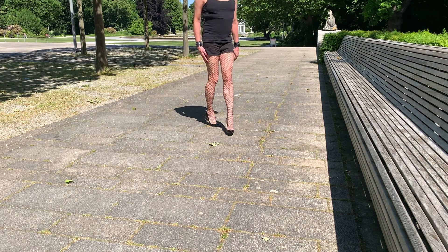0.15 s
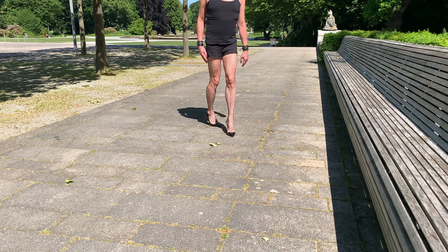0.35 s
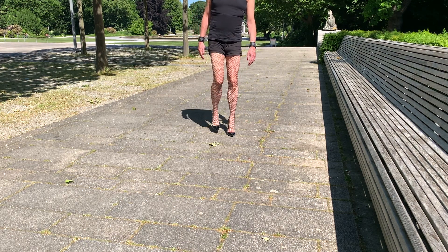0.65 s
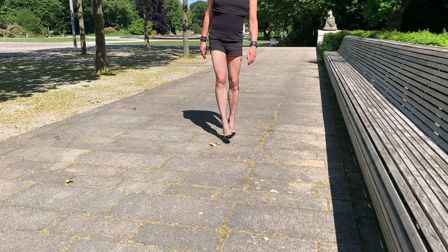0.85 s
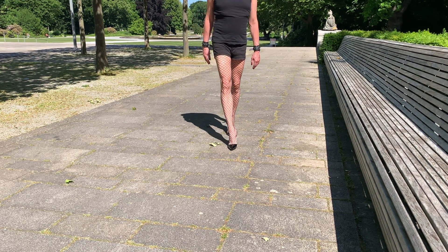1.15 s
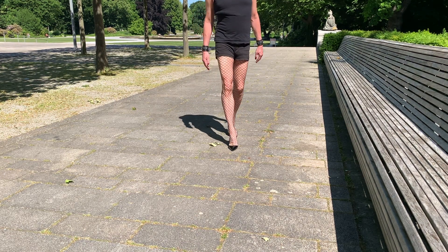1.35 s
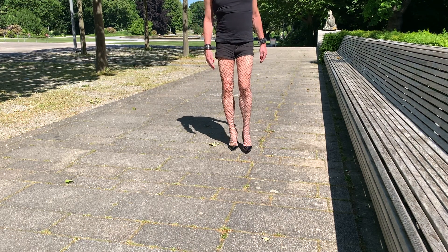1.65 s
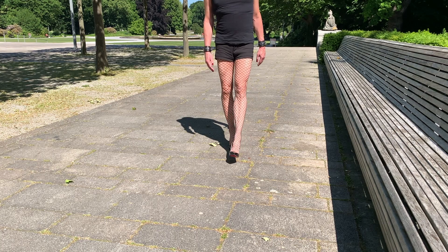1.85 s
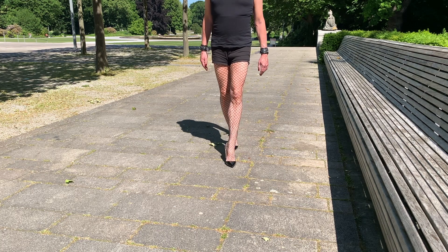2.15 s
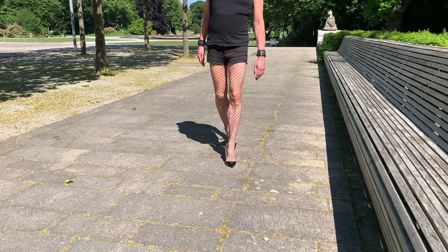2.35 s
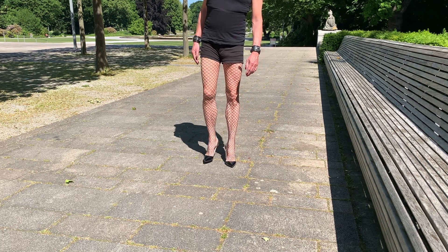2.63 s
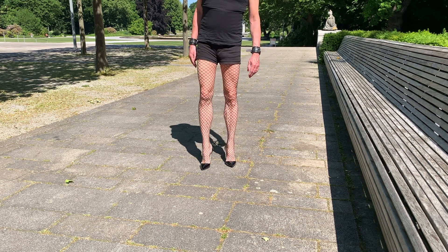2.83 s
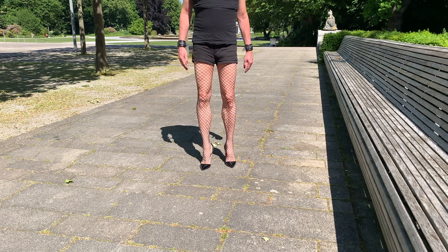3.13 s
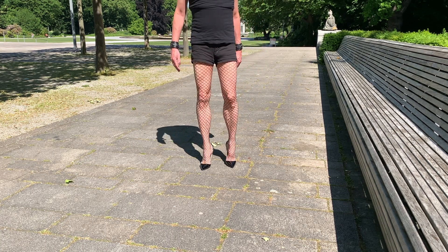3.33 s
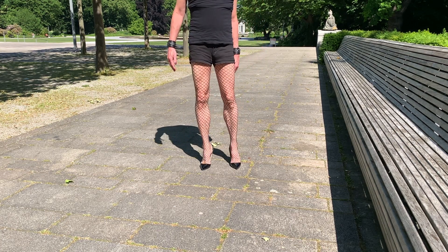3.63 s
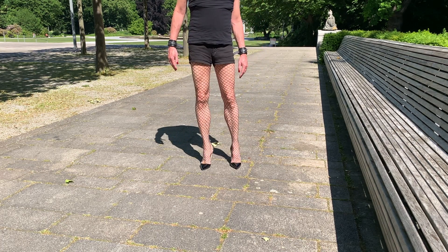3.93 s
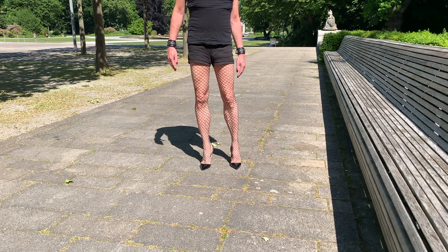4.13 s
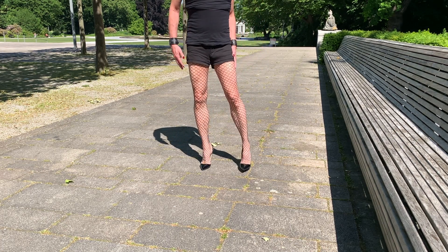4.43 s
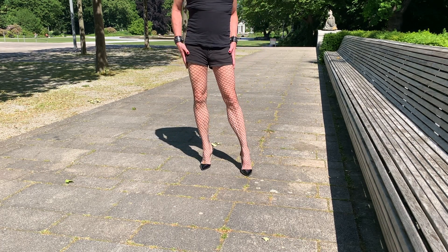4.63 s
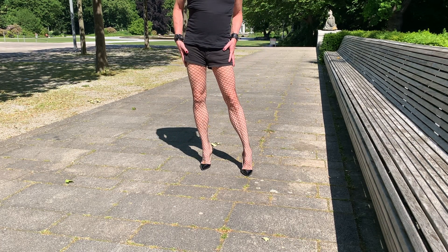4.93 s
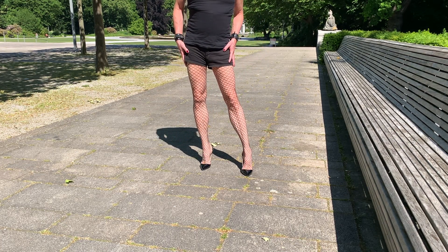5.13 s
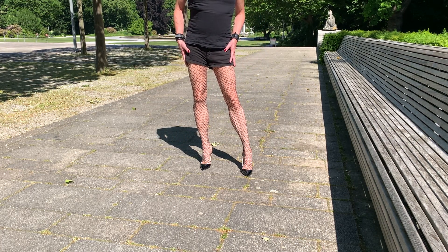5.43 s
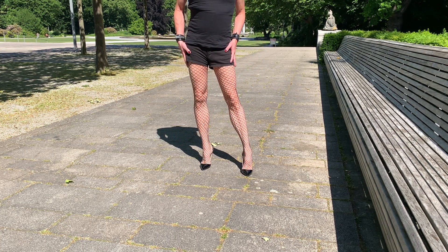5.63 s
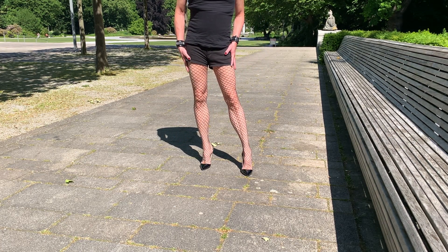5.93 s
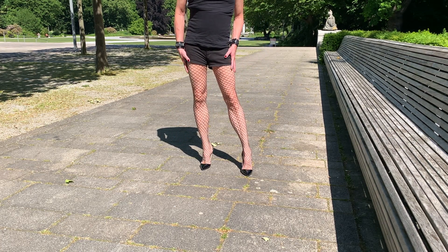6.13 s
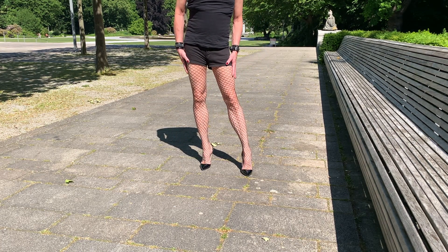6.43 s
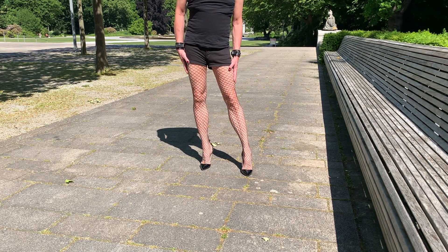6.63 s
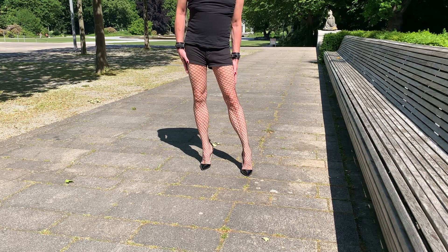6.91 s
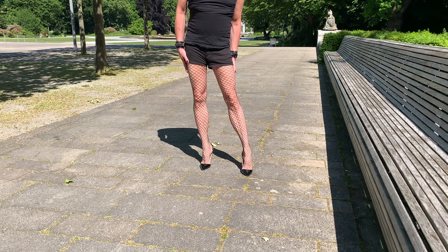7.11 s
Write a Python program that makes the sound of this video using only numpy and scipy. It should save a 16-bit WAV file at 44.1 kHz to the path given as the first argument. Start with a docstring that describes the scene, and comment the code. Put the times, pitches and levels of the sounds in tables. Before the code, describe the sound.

Slow, uneven steps of hard-tipped heels click and slap on gritty stone, with short reflections from a bench and trees. The strongest step comes past the middle, a final click follows, and walking ends. After that only faint cloth strokes, twittering birds and the wavering low hum of far engines remain, with a soft leafy hiss and small wind bumps at the stereo microphone standing some distance in front.

```python
"""A park with stone paving, where someone in high heels takes a few slow steps and comes to a stop.
Shoe resonances, struck by short blows and grit noise, make the heel clicks and sole slaps.
Shaped noise makes the scuff, the hands brushing cloth, the traffic, the leaves and the wind bumps.
Far engines are stacks of wavering sines; small birds in the trees are gliding sines with trembling pitch."""
import sys
import numpy as np
from scipy import signal
from scipy.fft import rfft, irfft, next_fast_len
from scipy.io import wavfile
from scipy.ndimage import uniform_filter1d

SR = 44100
rng = np.random.default_rng(int(sys.argv[2]) if len(sys.argv) > 2 else 0)


def log_audio(samples):
    """Write samples as a 16-bit WAV file to the path given in sys.argv[1]."""
    # one column per channel
    frames = np.atleast_2d(samples).T
    # limit to full scale, then quantise
    limited = np.clip(frames, -1, 1)
    pcm = np.round(limited * 32767).astype(np.int16)
    wavfile.write(sys.argv[1], SR, pcm)


N = 320607
TIME = np.arange(N) / SR


def from_db(db):
    """Decibels to gain."""
    return 10 ** (np.asarray(db) / 20)


def rms_one(x):
    """Scale to unit rms."""
    return x / np.sqrt(np.mean(x ** 2) + 1e-20)


def in_time(rows):
    """Each column of a curve, sample by sample."""
    s, *columns = np.transpose(rows)
    return [np.interp(TIME, s, c) for c in columns]


def at_hz(points, hz):
    """Read a spectrum on a log-frequency axis."""
    f, value = np.transpose(points)
    return np.interp(np.log(np.maximum(hz, 1)), np.log(f), value)


def add(out, s, sound):
    """Mix a sound in at a given time."""
    i = round(s * SR)
    out[i:i + len(sound)] += sound[:len(out) - i]


def bandpass(x, low, high):
    """Causal band-pass."""
    sos = signal.butter(2, [low, min(high, SR / 2 - 1)], "band", fs=SR, output="sos")
    return signal.sosfilt(sos, x)


def split_off(x, kind, hz):
    """Keep the lows or the highs on one side of a crossover, at unit rms."""
    return rms_one(signal.sosfilt(signal.butter(3, hz, kind, fs=SR, output="sos"), x))


def drift(rate, size):
    """A random wander: straight lines between normal draws, rate draws per second."""
    at = np.arange(size) * rate / SR
    return np.interp(at, np.arange(size), rng.standard_normal(size))


# how alike the two ears are: pitch_hz, likeness (1 same, 0 unrelated, -1 opposed)
EAR_LIKENESS = [(30, 0.97), (70, 0.92), (300, 0.88), (700, -0.38), (2000, -0.14), (5000, 0.23),
                (12000, -0.081)]


def stereo_noise(colour, size=N):
    """Coloured noise at unit rms, nearly alike in both ears in the bass and much less so above."""
    length = next_fast_len(size)
    hz = np.arange(length // 2 + 1) * SR / length
    mid, side = rfft(rng.standard_normal((2, length))) * from_db(at_hz(colour, hz))
    alike = np.clip(at_hz(EAR_LIKENESS, hz), -1, 1)
    ears = np.sqrt(1 + alike) * mid + np.sqrt(1 - alike) * side * [[1], [-1]]
    return rms_one(irfft(ears, length)[:, :size])


def bells(rows):
    """A gain that rises and falls smoothly around each start_s, width_s, level_db."""
    return sum(from_db(db) * np.exp(-.5 * ((TIME - s) / width) ** 2) for s, width, db in rows)


def friction(gain, colour, grain_db, grain_rate):
    """Sliding contact: noise that catches and lets go, grain_rate draws per second."""
    return gain * rms_one(stereo_noise(colour) * from_db(grain_db * drift(grain_rate, N)))


def from_left(x, lag_s):
    """Two ears; the right one hears the sound a little later."""
    return np.array([x, np.interp(TIME - lag_s, TIME, x)])


def patchy(x, patchy_db, size):
    """Moving air lets each narrow band of a far sound swell and fade on its own."""
    _, _, cells = signal.stft(x, nperseg=size)
    swell = rng.standard_normal(cells.shape[1:])
    swell = uniform_filter1d(swell, size=5, axis=0)   # across pitch
    swell = uniform_filter1d(swell, size=9, axis=1)   # across time
    return signal.istft(cells * from_db(patchy_db * rms_one(swell)), nperseg=size)[1][:, :N]


# colour of traffic and leaves together: pitch_hz, relative_level_db (per Hz)
AIR_COLOUR = [(25, -24), (42, -9.5), (60, 3), (80, -4.5), (115, -12), (190, -14.5), (240, -22),
              (400, -23.5), (750, -31), (1300, -45.5), (1850, -44.5), (2550, -45.5), (3100, -52),
              (5000, -60.5), (9000, -70), (14000, -65.5), (15000, -91.5)]
# the breeze lifts and drops the deepest rumble: time_s, change_db
BREEZE = [(0, 3.5), (0.9, -3), (1.2, -6), (3.2, 0.5), (3.65, 6), (4.0, -6.5), (4.9, -3), (5.5, -0.5),
          (7.27, 2)]
# the leaves rustle more and less: time_s, level_db
LEAF_HISS = [(0, -65), (0.9, -64.5), (1.6, -64), (2.8, -64), (5.2, -62.8), (6.1, -65)]
RUMBLE_DB, RUMBLE_SWELL_DB = -47.5, 0.5


def air(split_hz=1100, breeze_hz=62):
    """Traffic rumble below, leaves and tyres above, each with its own slow swell."""
    noise = patchy(stereo_noise(AIR_COLOUR), patchy_db=2.0, size=2048)
    rumble, hiss = split_off(noise, "low", split_hz), split_off(noise, "high", split_hz)
    deep = signal.sosfiltfilt(signal.butter(2, breeze_hz, fs=SR, output="sos"), rumble)
    (breeze_db,), (leaf_db,) = in_time(BREEZE), in_time(LEAF_HISS)
    rumble = rumble + (from_db(breeze_db) - 1) * deep
    return from_db(RUMBLE_DB + RUMBLE_SWELL_DB * drift(1, N)) * rumble + from_db(leaf_db) * hiss


ENGINE_LAG_S = 0.00043   # the engines reach the left ear this much earlier


def engine(pitch, level, orders, level_db, waver):
    """A far exhaust note: multiples of one pitch, each made to waver on its own by the air."""
    (hz,), (db,) = in_time(pitch), in_time(level)
    phase = 2 * np.pi * np.cumsum(hz) / SR
    tones = sum(from_db(order_db) * np.sin(k * phase) * (1 + waver * drift(14, N))
                for k, order_db in orders)
    return np.sqrt(2) * from_db(db + level_db) * tones


# the engine sags once, then runs nearly steadily: time_s, pitch_hz
DRONE_PITCH = [(0, 91.3), (.25, 86.1), (.7, 88.6), (1.05, 90), (2.4, 90.23), (7.27, 91.18)]
# its drone swells and fades: time_s, relative_level_db
DRONE_LEVEL = [(0.0, -50), (0.16, -53), (0.2, -57.5), (0.36, -43), (0.6, -39), (0.93, -46), (0.989, -55.5),
               (1.21, -41), (1.78, -45), (2.09, -65.5), (2.35, -42.5), (2.63, -35.5), (3.02, -39.5),
               (3.2, -44.5), (4.59, -42.5), (5.08, -50), (5.91, -38.5), (6.17, -56.5), (6.72, -33),
               (7.25, -40), (7.27, -37)]
# its harmonics: multiple of the pitch, relative_level_db
DRONE_ORDERS = [(1, 1), (2, -26.5), (3, -43), (4, -30.5)]


def near_engine():
    """The nearer engine: a fairly steady exhaust drone, mostly its fundamental."""
    return engine(DRONE_PITCH, DRONE_LEVEL, DRONE_ORDERS, level_db=-0.84, waver=0.1)


# the engine winds down twice: time_s, pitch_hz
FAR_PITCH = [(0, 133.4), (1.5, 139.7), (2.3, 130.7), (2.9, 116.4), (4.7, 136), (5.6, 126.3), (7.27, 121.1)]
# its loudness: time_s, relative_level_db
FAR_LEVEL = [(0, -53.5), (2.3, -53), (3.9, -55.5), (5.2, -53), (6.4, -52), (7.27, -71)]
# its partials: multiple of the pitch, relative_level_db
FAR_ORDERS = [(1, -2), (1.5, -13.5), (2, -13), (3, -16.5)]


def far_engine():
    """A second engine, its partials wavering strongly in the air."""
    return engine(FAR_PITCH, FAR_LEVEL, FAR_ORDERS, level_db=-3.0, waver=0.74)


# thump, knock, clack, tick and ping ranges of the shoe: low_hz, high_hz
SHOE_PARTS = [(240, 725), (830, 1460), (1520, 4060), (4200, 7860), (8400, 13600)]
THUMP_PART, KNOCK_PART, PING_PART = np.eye(5)[[0, 1, 4]]
HARDNESS_PIVOT_HZ = 1460
# how sole and heel ring when they are not the part that lands
SOLE_HZ, HEEL_HZ, RING_S = 658, 1760, 0.024


def landing(db, hardness, shares_db):
    """Level of each part in dB; a harder landing tilts the sound brighter about the pivot pitch."""
    octaves = np.log2(np.sqrt(np.prod(SHOE_PARTS, axis=1)) / HARDNESS_PIVOT_HZ)
    return db + hardness * octaves + shares_db


# the sole slaps the stone: start_s, level_db, hardness_db_per_octave, hollow_knock_db,
# sole_pitch_hz, heel_pitch_hz, ring_t60_s
SOLE_SLAPS = [(0.1898, -38.5, -2, -1, 630, 1380, 0.012), (1.114, -37, -4, 5, 690, 1400, 0.0097),
              (1.2168, -38, -2, -3.5, 757, 1330, 0.027), (2.1312, -43.5, 0.5, -11, 453, 2000, 0.0027),
              (2.8135, -53, -4.5, 13.5, 784, 1270, 0.0039), (2.8265, -47.5, -3, 1.5, 780, 1250, 0.0061),
              (2.8395, -57.5, -5, 7, 520, 1310, 0.014), (3.6175, -33.5, -0.5, -0.5, 650, 2250, 0.01),
              (4.5556, -29.5, -0.3, 2.5, 497, 1620, 0.0078), (4.5598, -37, 1.5, -9, 674, 2560, 0.014),
              (4.5658, -33.5, 0.1, 0.5, 816, 3480, 0.0024), (4.5803, -50.5, 4, 16.5, 820, 3550, 0.006),
              (4.9215, -43, -2.5, -15, 540, 990, 0.0027)]
# a slap's share in thump, knock, clack, tick and ping: relative_level_db
SLAP_PARTS_DB = [-2, -4, -10.5, -31, -31]
SOLE_GRIT = 0.12   # how much grit a sole grinds as it lands, 0-1


def sole_slaps():
    """Flat sole landings, strongest in the low parts of the shoe."""
    return [(s, landing(db, hardness, SLAP_PARTS_DB) + knock_db * KNOCK_PART,
             sole_hz, heel_hz, ring_s, SOLE_GRIT)
            for s, db, hardness, knock_db, sole_hz, heel_hz, ring_s in SOLE_SLAPS]


# the heel tip strikes: start_s, level_db, hardness_db_per_octave, thump_db, hollow_knock_db,
# metal_ping_db, heel_pitch_hz, ring_t60_s, grit (0-1)
HEEL_TAPS = [(0.1901, -56, 7.5, -2, -2, -16, 4260, 0.0043, 0.2),
             (0.1939, -46.5, 6, 15, 11, -8.5, 5400, 0.0093, 0.02),
             (0.2009, -49.5, 0, 0.5, 8, -8, 6300, 0.014, 0.14),
             (0.204, -51.5, 0.5, -11, 4, -1, 2800, 0.014, 0.1),
             (0.5102, -54, 1.5, -7, -5, 1, 1750, 0.026, 0.23),
             (1.2161, -56, 4, -6, -2, 0, 1900, 0.013, 0.26),
             (1.2235, -52, -4.5, -7, 1, 4, 2190, 0.012, 0.42),
             (2.139, -68.5, 12.5, 0, -2, -8.5, 3650, 0.0043, 0.11),
             (2.2678, -47.5, 4.5, -12, 3, 0.5, 3380, 0.0029, 0.08),
             (2.2708, -55.5, 3, -1, 10, 3, 3400, 0.0026, 0.47),
             (3.09, -54.5, 2, -11, 3, -1, 1800, 0.019, 0.22),
             (3.0981, -60.5, 0.5, -2, 3, 10, 1740, .012, .3),
             (3.581, -37.5, 2.2, -2.5, -5, -2, 2722, 0.0075, 0.07),
             (3.5921, -50, 2, 3, -3, 9, 2760, 0.0038, 0.1),
             (3.622, -37.5, -4, -19, -2, -12, 2200, 0.016, 0.2),
             (4.195, -59, -3.5, 2, -10, -2, 3780, 0.025, 0.1),
             (4.5686, -48.5, -1.5, 4, -3, 1, 2560, 0.0087, 0.13),
             (4.9172, -45, -3.5, -21, -9, 13, 3730, 0.044, 0.46),
             (4.919, -43, -5, -20, 0.5, 4, 1730, 0.041, 0)]
# a tap's share in thump, knock, clack, tick and ping: relative_level_db
TAP_PARTS_DB = [-1, -8, -1, -14.5, -19]


def heel_taps():
    """Heel tip clicks, each with its own thump, hollow knock and metal ping."""
    taps = []
    for s, db, hardness, thump_db, knock_db, ping_db, heel_hz, ring_s, grit in HEEL_TAPS:
        accents = thump_db * THUMP_PART + knock_db * KNOCK_PART + ping_db * PING_PART
        part_db = landing(db, hardness, TAP_PARTS_DB) + accents
        taps.append((s, part_db, SOLE_HZ, heel_hz, ring_s, grit))
    return taps


# a grain of grit cracks under the shoe: start_s, level_db, hardness_db_per_octave, grit (0-1)
GRIT_TICKS = [(.3619, -62, 2, 0.3), (0.4654, -59.5, 3.5, 0.5), (.981, -71, 2, 0.5),
              (1.1138, -60.5, -1, 0.26), (2.8138, -59.5, -2, 0.24), (2.8351, -60, 0, 0.6),
              (3.578, -59, -3, 0.44), (3.589, -56, 1, 0.1), (4.2839, -69.5, 5, 0.08)]
# a crack's share in thump, knock, clack, tick and ping: relative_level_db
GRIT_PARTS_DB = [10.5, -10, -9, -8, -4.5]


def grit_ticks():
    """Small cracks of grit that set the whole shoe ringing."""
    return [(s, landing(db, hardness, GRIT_PARTS_DB), SOLE_HZ, HEEL_HZ, RING_S, grit)
            for s, db, hardness, grit in GRIT_TICKS]


# what the shoe rings with before each touch shifts and damps it: pitch_hz, relative_level_db, t60_s
SHOE_MODES = [(326, -8, 0.0078), (530, -20, 0.0056), (980, -5, 0.013), (1084, -20, 0.014),
              (1300, -16, 0.027), (2395, -2, 0.0063), (2790, -3, 0.0034), (3920, -4, 0.0053),
              (5160, 1, 0.0048), (6000, -3, 0.011), (9600, -12.5, 0.0062), (14000, 4, 0.0046)]
# a touch that rings shorter than this is pressed down hard, which damps the whole shoe
FREE_RING_S = 0.0091
STEP_LAG_S = .000023   # the steps reach the left ear this much earlier


def footsteps(scrape_in_s=0.00081, crush_s=0.0016, pitch_spread=0.03,
              sole_db=9.0, heel_db=11.5, heel_decay_ratio=0.39):
    """The shoe grazes the grit, strikes and crushes it; how it lands decides which parts ring."""
    out, t = np.zeros(N), TIME[:SR // 20]
    lead, blow_samples = SR // 500, SR // 200   # 2 ms of graze, 5 ms as the span for levels
    since = t - t[lead]
    grinding = np.exp(np.minimum(since / scrape_in_s, -since / crush_s))
    for s, part_db, sole_hz, heel_hz, ring_s, grit in sole_slaps() + heel_taps() + grit_ticks():
        force = grit * grinding * rng.standard_normal(len(t))
        force[lead:lead + 3] += [.4, .8, .2]   # the blow itself, a few samples long
        # body weight bends and damps the shoe, so its two main resonances change from touch to touch
        loaded = [(sole_hz, sole_db, ring_s), (heel_hz, heel_db, heel_decay_ratio * ring_s)]
        hz, mode_db, t60 = np.transpose(SHOE_MODES + loaded)[:, :, None]
        hz[:-2] *= np.exp(pitch_spread * rng.standard_normal(hz[:-2].shape))
        t60[:-2] *= min(ring_s / FREE_RING_S, 1)
        modes = from_db(mode_db - 60 * t / t60) * np.cos(2 * np.pi * hz * t)
        ring = signal.fftconvolve(force, modes.sum(0))[:len(t)]
        for (low, high), db in zip(SHOE_PARTS, part_db):
            part = bandpass(bandpass(ring, low, high), low, high)
            part = part * np.sqrt(blow_samples / np.sum(part ** 2))
            add(out, s - t[lead], from_db(db) * part)
    return out


# colour of sound scattered back by bench and trees: pitch_hz, relative_level_db
PARK_COLOUR = [(150, -6), (500, -1.5), (1200, -4), (2600, 0.5), (6000, 4), (10000, 1.5), (15000, -1.5)]


def park(x, wet_db, t60, build_s, uneven_db, facets_per_s=450):
    """Echoes that build up and die away, in uneven clumps from slats and trunks."""
    t = TIME[:SR]
    clumps = from_db(uneven_db * drift(facets_per_s, SR))
    envelope = from_db(-60 * t / t60) * (1 - np.exp(-t / build_s))
    echoes = stereo_noise(PARK_COLOUR, size=SR) * clumps * envelope
    echoes /= np.sqrt(np.sum(echoes ** 2) / 2)
    return from_db(wet_db) * signal.fftconvolve(x[None], echoes, axes=1)[:, :N]


# a sole drags on grit: time_s, level_db
SCUFF = [(.2, -69), (.3, -62.5), (.37, -61.5), (.5, -59.5), (.56, -68.5), (.75, -70), (.9, -103)]
# its colour: pitch_hz, relative_level_db
SCUFF_COLOUR = [(500, -19.5), (1150, -3), (1400, 4.5), (1650, -8.5), (2100, 3.5), (3000, -20), (6000, -25),
                (14000, -33.5)]


def scuff():
    """A sole dragging over grit, a coarse grainy friction."""
    (level_db,) = in_time(SCUFF)
    return friction(from_db(level_db), SCUFF_COLOUR, grain_db=3.5, grain_rate=460)


def whistle(length, start_hz, end_hz, db, rasp_hz, bend=0.95):
    """One gliding note with a trembling pitch; a small bend makes it move fast, then level out."""
    u = np.linspace(0, 1, round(length * SR))
    hz = start_hz + (end_hz - start_hz) * u ** bend + rasp_hz * drift(900, SR // 2)[:len(u)]
    return from_db(db) * np.sqrt(8 * u * (1 - u)) * np.sin(2 * np.pi * np.cumsum(hz) / SR)


def quaver(calls, quaver_db=3.5):
    """Bird calls with a rapidly quavering loudness."""
    return calls * from_db(quaver_db * drift(90, N) - 3.5)


# thin two-voiced calls: start_s, length_s, upper_start_hz, upper_end_hz, upper_relative_db,
# lower_start_hz, lower_end_hz, lower_relative_db
THIN_CALLS = [(0.981, 0.069, 8460, 7950, -72, 6500, 5930, -69.5),
              (2.314, 0.057, 8800, 7720, -67, 6800, 6300, -73),
              (2.473, 0.085, 8650, 7540, -80, 6460, 5780, -76),
              (3.019, 0.042, 8600, 8100, -78, 6170, 5800, -76),
              (3.131, 0.064, 8850, 7900, -76, 6500, 5850, -79),
              (3.293, 0.047, 8450, 8040, -84, 6000, 5600, -79),
              (3.935, 0.1, 8260, 7770, -72.5, 6670, 5900, -71),
              (4.14, 0.058, 8300, 7900, -85, 6520, 5980, -72.5),
              (5.178, 0.07, 8600, 7700, -80, 6330, 6000, -74),
              (5.254, 0.062, 8950, 7800, -71.5, 6500, 6080, -74),
              (5.35, 0.055, 8400, 7900, -81, 6440, 5900, -71.5),
              (5.428, 0.055, 8500, 7940, -74, 6250, 5870, -80),
              (6.094, 0.07, 8350, 7900, -74, 6400, 6000, -75)]
# the upper voice drops fast and levels out; the lower one joins late and slides more evenly
UPPER_BEND, LOWER_BEND, LOWER_LATE_S = 0.55, 0.81, 0.014


def thin_calls(tremble_hz=85):
    """Thin calls sung with both sides of the syrinx, two falling notes at once."""
    out = np.zeros(N)
    for s, length, *voices in THIN_CALLS:
        add(out, s, whistle(length, *voices[:3], tremble_hz, bend=UPPER_BEND))
        add(out, s + LOWER_LATE_S, whistle(length, *voices[3:], tremble_hz, bend=LOWER_BEND))
    return out


# a near songbird repeats one falling chirp: start_s, relative_level_db
CHIRPS = [(1.03, -69), (1.112, -63), (1.193, -61.5), (1.276, -61), (1.359, -61), (1.444, -58.5),
          (1.536, -62.5)]
CHIRP_S, CHIRP_START_HZ, CHIRP_END_HZ, CHIRP_RASP_HZ = 0.0252, 3640, 2870, 40.2
CHIRP_ECHO_DB = -4   # being near, it raises less echo than the other birds


def songbird():
    """The near bird's row of crisp falling chirps."""
    out = np.zeros(N)
    for s, db in CHIRPS:
        add(out, s, whistle(CHIRP_S, CHIRP_START_HZ, CHIRP_END_HZ, db, CHIRP_RASP_HZ, bend=1.18))
    return out


# the sole slips a little as it takes the weight: start_s (centre), width_s, level_db
SLIPS = [(1.248, 0.03, -58), (4.615, 0.045, -62.5)]
# its colour: pitch_hz, relative_level_db
SLIP_COLOUR = [(1000, 5), (2600, 5), (4500, -14), (10000, -7.5), (15000, -24)]


def sole_slips():
    """Short bell-shaped rushes of noise from a slipping sole."""
    return stereo_noise(SLIP_COLOUR) * bells(SLIPS)


# wind bumps: start_s (centre), width_s, relative_level_db
GUSTS = [(3.531, 0.017, -34), (7.159, 0.087, -40)]
# their colour: pitch_hz, relative_level_db
GUST_COLOUR = [(25, -14), (50, 6.5), (70, 18), (120, 9), (200, -26), (500, -66)]


def wind_bumps():
    """Eddies of wind on the microphone, short deep swells of noise."""
    return stereo_noise(GUST_COLOUR) * bells(GUSTS)


# lone drawn-out whistles: start_s, length_s, start_hz, end_hz, relative_level_db, rasp_hz
WHISTLES = [(4.278, 0.09, 7740, 7000, -70.5, 260), (6.15, 0.11, 7950, 7350, -72, 300),
            (6.348, .26, 3890, 4210, -64, 297), (7.074, 0.14, 8270, 7220, -69, 199)]


def lone_whistles():
    """Single gliding bird notes, roughened by a trembling pitch."""
    out = np.zeros(N)
    for s, *note in WHISTLES:
        add(out, s, whistle(*note))
    return out


# hands stroke over cloth: start_s (centre), width_s, relative_level_db
STROKES = [(4.78, 0.062, -71), (5.85, 0.1, -70.5), (6.18, 0.11, -72), (6.55, 0.14, -70), (6.87, .035, -77),
           (7.0, 0.17, -82)]
# its colour: pitch_hz, relative_level_db
RUB_COLOUR = [(1000, -3.5), (3000, 12), (5000, 0.5), (10000, 3), (14000, 0.5), (16000, -24.5)]


def cloth_rubs():
    """Hands brushing over cloth, a soft friction in slow strokes."""
    return friction(bells(STROKES), RUB_COLOUR, grain_db=2.0, grain_rate=130)


# farther birds chatter: start_s, notes, period_s, note_length_s, start_hz, end_hz,
# relative_level_db, fade_at_start_db, rasp_hz
SONG = [(4.862, 6, 0.075, 0.024, 4190, 3720, -64.5, 1.5, 200),
        (5.315, 4, 0.076, 0.04, 4250, 3286, -64.5, 0, 242),
        (5.692, 3, 0.17, 0.062, 3770, 4590, -72.5, -2.5, 396)]
PHRASE_PEAK = 0.83   # a phrase peaks (or dips, if its fade is negative) this far through


def trills():
    """Phrases of one repeated gliding note, shaped in loudness along the way."""
    out = np.zeros(N)
    for s, count, period, length, start_hz, end_hz, db, fade_db, rasp_hz in SONG:
        for k, through in enumerate(np.linspace(0, 1, round(count))):
            note_db = db - fade_db * abs(through - PHRASE_PEAK) / PHRASE_PEAK
            add(out, s + k * period, whistle(length, start_hz, end_hz, note_db, rasp_hz, bend=0.66))
    return out


def scene():
    """Walker, birds and air lean slightly right in level; engines and wind bumps lean a little more."""
    steps, chirps = footsteps(), songbird()
    song = trills() + quaver(thin_calls() + lone_whistles())
    bench = park(steps, wet_db=-7.5, t60=0.062, build_s=0.00075, uneven_db=0.5)
    trees = park(steps, wet_db=-11.5, t60=0.24, build_s=0.016, uneven_db=5.0)
    walker = from_left(steps, STEP_LAG_S) + bench + trees + scuff() + cloth_rubs() + sole_slips()
    echoed = song + from_db(CHIRP_ECHO_DB) * chirps
    song_echo = park(echoed, wet_db=-1.5, t60=0.27, build_s=0.01, uneven_db=2.5)
    birdsong = from_db(-3.0) * (song + chirps + song_echo)
    lows = from_left(near_engine() + far_engine(), ENGINE_LAG_S) + wind_bumps()
    return (walker + birdsong + air()) * from_db([[-.5], [.5]]) + lows * from_db([[-1.1], [1.1]])


# the microphone port swallows a narrow band; above the cutoff the top is gone
MIC_NOTCH_HZ, MIC_NOTCH_Q, CUTOFF_HZ = 11850, 9.0, 16300


def record(dry):
    """Soft 5 ms opening and close, a notch in the high treble and a steep cut at the top."""
    edges = np.minimum(np.minimum(TIME, TIME[::-1]) / .005, 1)
    heard = signal.lfilter(*signal.iirnotch(MIC_NOTCH_HZ, MIC_NOTCH_Q, fs=SR), dry * edges)
    return signal.sosfilt(signal.ellip(10, .1, 80, CUTOFF_HZ, fs=SR, output="sos"), heard)


dry = scene()
out = record(dry)
log_audio(out)
```